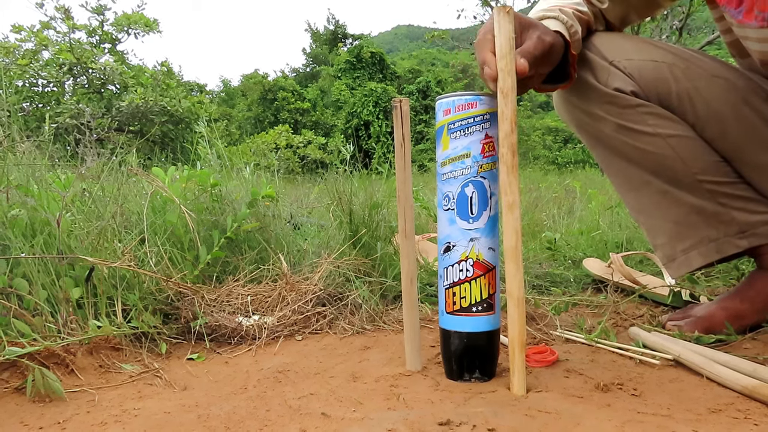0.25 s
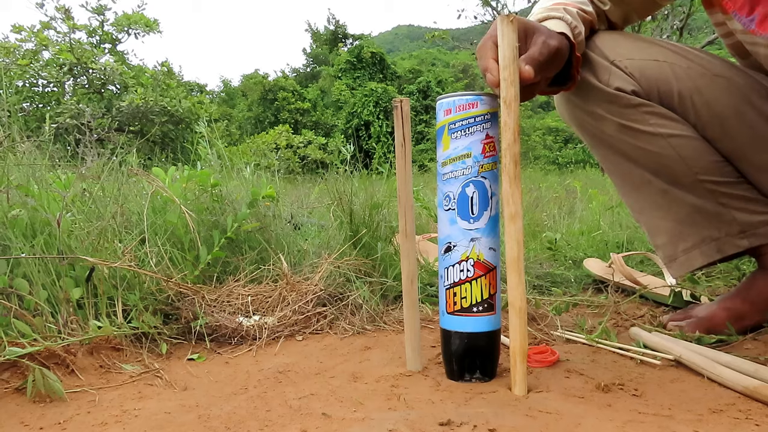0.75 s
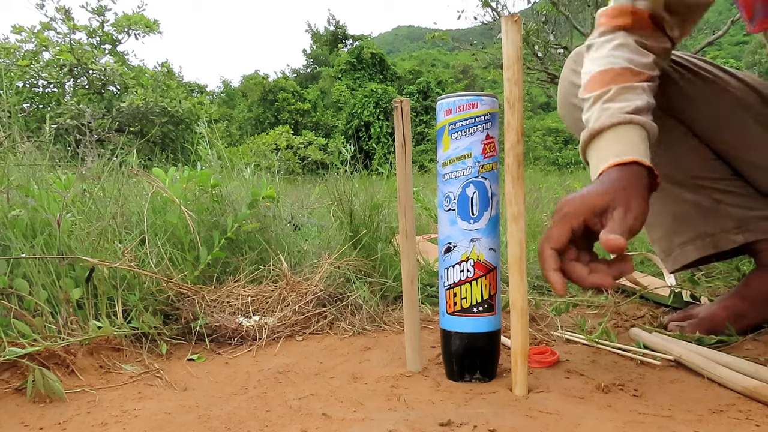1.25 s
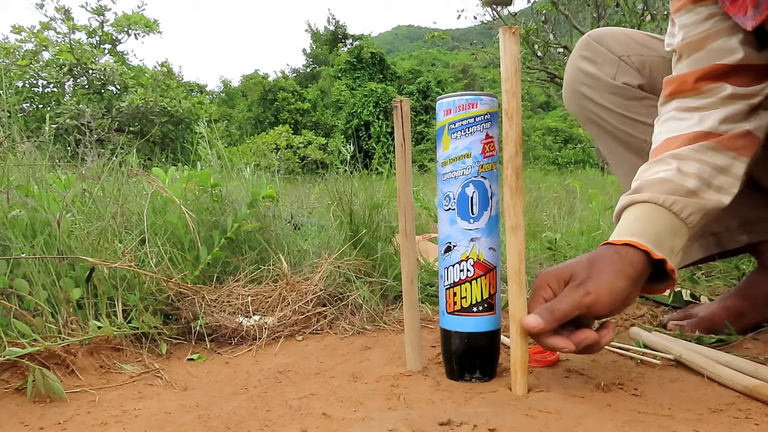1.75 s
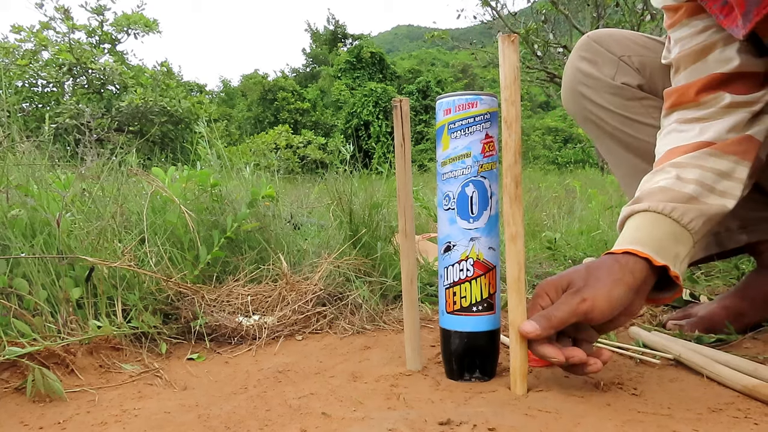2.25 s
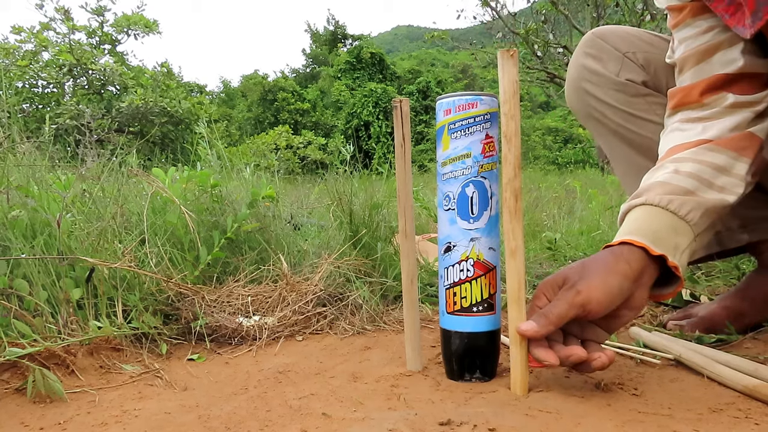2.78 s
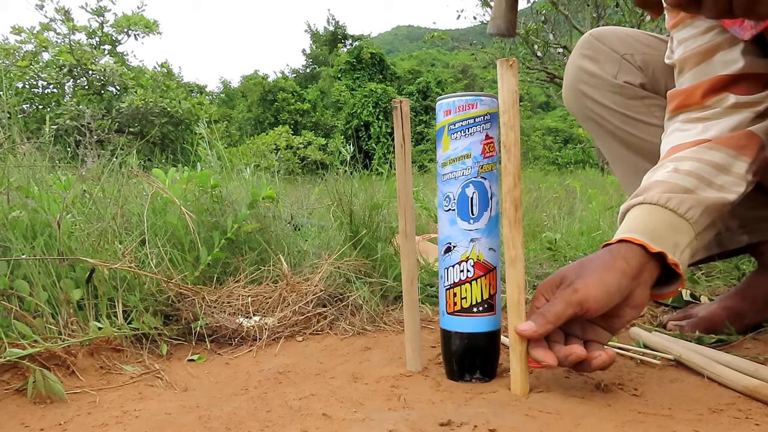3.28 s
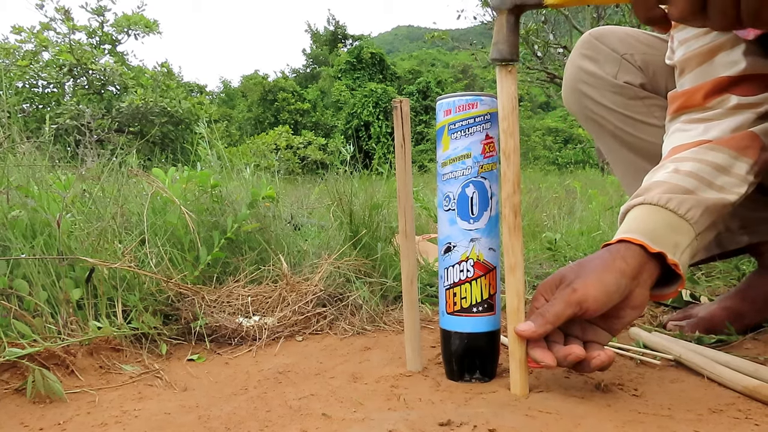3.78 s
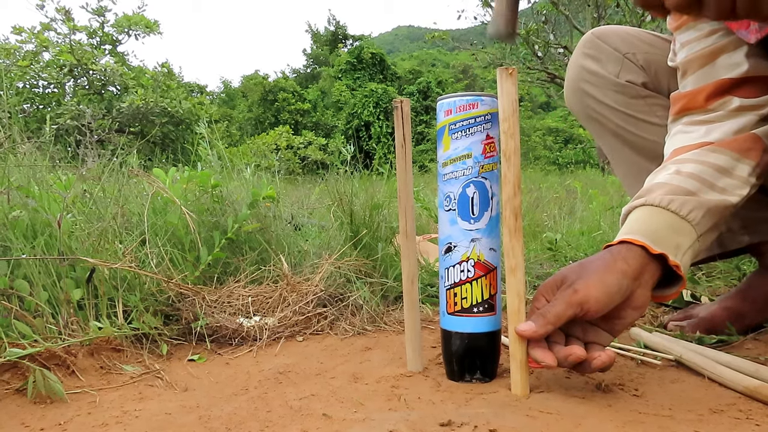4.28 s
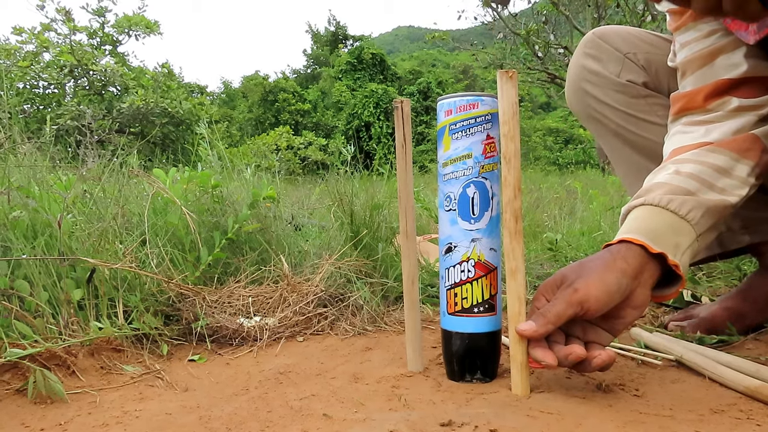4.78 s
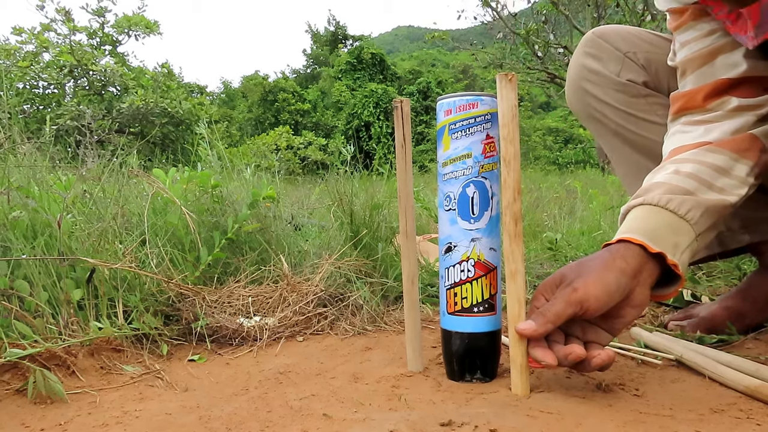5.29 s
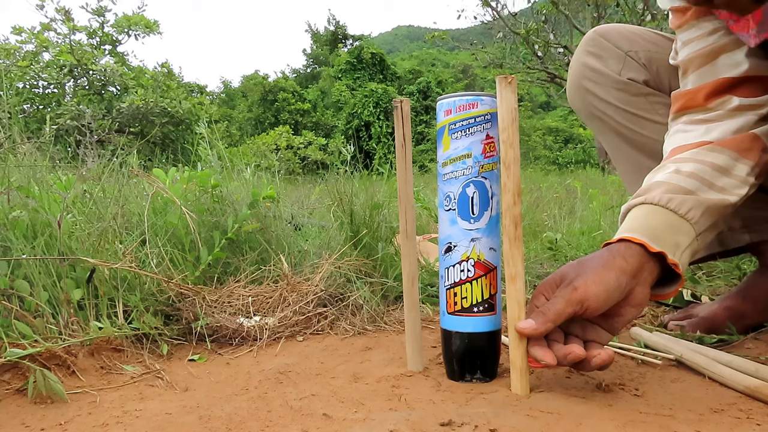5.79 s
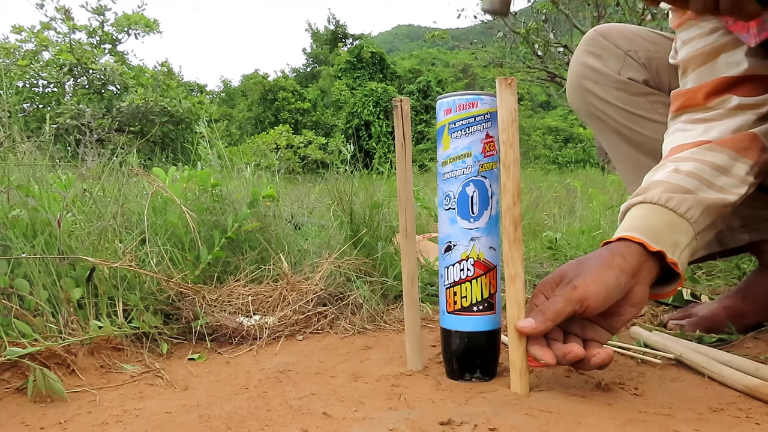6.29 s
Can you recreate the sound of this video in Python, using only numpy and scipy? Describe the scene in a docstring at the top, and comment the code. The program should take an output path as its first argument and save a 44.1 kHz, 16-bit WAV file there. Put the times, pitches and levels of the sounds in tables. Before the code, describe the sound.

Outdoors on sandy ground, short bright knocks of steel on wood come steadily and very near, slightly right of centre. The fourth hit slips into a quick rattling cluster, followed by a pause and a soft cloth rub. Hammering continues with hollow woody clacks and a faint metallic ring, then deepens into solid thuds as the stake seats. Little echo, only a slight scatter from grass and bushes; thin birds and fading breeze far behind.

```python
"""An open field with sandy ground: a steel hammer drives a thin wooden stake close to the microphones.
Each blow sums decaying wood modes, fibre noise, a low soil thump, a faint steel note and an outdoor echo;
as the stake seats, the thump grows deep and firm. One blow glances off and stutters with a noisy skid.
A sleeve rubs (noise shaped by arm speed), small birds whistle far away (gliding sines), and a light
breeze (filtered noise) lies around it all."""
import sys
import numpy as np
from scipy import signal
from scipy.fft import rfft, irfft, next_fast_len
from scipy.io import wavfile
from scipy.ndimage import uniform_filter1d, minimum_filter1d, map_coordinates

SR = 44100
rng = np.random.default_rng(int(sys.argv[2]) if len(sys.argv) > 2 else 0)


def put_to_file(sound):
    """Save the sound as 16-bit audio at rate SR, in the file named by the first command-line argument."""
    columns = np.atleast_2d(sound).T  # one column per channel
    safe = np.clip(columns, -1, 1)
    whole_steps = np.round(safe * 32767)
    wavfile.write(sys.argv[1], SR, whole_steps.astype(np.int16))


N = 288414
T = np.arange(int(.3 * SR)) / SR  # time within one blow, s

# breeze: t/s, rumble level before trim/dB, hiss level before trim/dB
BREEZE = [(0.0, -50, -56), (1.64, -50, -56), (3.01, -56, -63), (3.79, -54.5, -61.5), (6.54, -61, -67.5)]
# spectra of the breeze, before scaling to rms 1: f/Hz, level/dB
RUMBLE_SPECTRUM = [(15, -38), (25, -7.5), (43, 4), (75, 2), (147, -2), (403, -10), (492, -39), (600, -11),
                   (780, -45.5), (1320, -120)]
HISS_SPECTRUM = [(240, -30), (400, -5), (510, -6.5), (630, -5.5), (768, -8.5), (854, -1.5), (1160, -14),
                 (1210, -11.5), (2060, -14), (3340, -18), (4330, -18.5), (13100, -36.5), (15000, -49.5)]
# stereo width of breeze and cloth: f/Hz, side minus mid level/dB
STEREO_WIDTH = [(60, -20.5), (180, -1), (550, -0.5), (1650, -2), (4970, -3), (15000, 0)]
# hammer contacts: t/s, force level/dB, squareness of the hit/dB, extra clack of the shaft/dB
HAMMER_BLOWS = [(0.2098, -1, 1, -6), (0.4997, 0.5, -4, 3), (0.7926, -1, 4, 1), (1.0889, 2, -9.5, 0),
                (1.1028, -7, -12, -2), (1.121, -7.5, -7.5, -6), (1.132, 2, -0.5, -5),
                (1.1382, -10, 4, -3.5), (1.542, 0, -1, -2), (1.876, 1.5, 0.5, 3), (2.1844, -0.5, 2.5, -1.5),
                (2.4932, -1.5, 4.5, -1), (2.8049, 0, 1, 1.5), (3.0957, 0, -3, 0.5), (3.3936, -0.5, -1, -1),
                (3.672, 0.5, -1, 0.5), (3.953, 0.5, -2, 0.5), (4.2218, 1.5, -1, 1), (4.4935, 1, -1, -2),
                (4.7596, 1, -0.6, 0), (5.0332, 0.6, -0.5, 1), (5.3034, 1.5, -1, 0), (5.5753, -1, 2, -1),
                (5.8372, -0.5, -1.2, -1.5), (6.0895, -1, -1.5, -2.5), (6.331, 0.5, -2.5, -3.5)]
# mean levels in a blow: gripped at the top/dB, free and loose/dB, seated/dB, gain per dB of squareness/dB
# rows: thump of the soil, then knock, clack, snap and edge of the wood
BLOW_VOICES = [(-18, -21.5, -8, 0), (-23, -22.5, -22, 0), (-16, -13, -19.5, 0.57),
               (-18.5, -13.5, -17.2, 1.03), (-34.5, -28, -25.5, 1.68)]
# borders of the knock, clack, snap and edge registers of the wood: f/Hz
REGISTER_EDGES = [350, 1000, 2300, 5200, 15000]
# stake modes: mean f/Hz, t60 in loose soil/s, level gripped/dB, level free and loose/dB, level seated/dB
STAKE_MODES = [(469, 0.033, -5.5, -7.5, -8), (574.7, 0.026, -4.5, -11.5, -3.5),
               (756, 0.023, -24, -11.5, -12.5), (834, 0.02, -10.5, -13.5, -11.5),
               (1257, 0.017, -1.5, -5.5, -5.5), (1573, .016, 0.5, 0, -9), (1743, 0.017, -6.5, -1, -5),
               (2143, 0.013, -7, -4.5, -12.5), (2558, 0.017, -4, -11.5, -4), (2888, 0.012, 4, 0, -5),
               (3562, 0.011, -13.5, -10, -4), (3867, .021, -5, -7, -8.5), (3973, 0.017, 2.5, -5, -3),
               (4340, 0.007, -7, -22, 4), (4898, 0.018, -13, -11.5, -11.5), (5618, 0.014, -10, -10, -5),
               (6467, 0.013, -29, -15.5, -11), (6814, 0.014, -25.5, -20, -10.5),
               (7700, .016, -26.5, -22, -15), (8376, 0.013, -15, -21, -11.5),
               (9305, 0.0092, -15, -26.5, -18), (10400, 0.019, -32, -26, -29.5)]
# crunch of the wood fibres: f/Hz, level/dB
FIBRE_SPECTRUM = [(400, -2.5), (1000, -6.5), (1800, -6), (4000, 0.5), (7000, -12), (11000, -24.5),
                  (16000, -37)]
# the stake swaying in loose and in firm soil: f/Hz, t60/s, level/dB
LOOSE_SOIL_MODES = [(141, 0.054, 3.5), (213, 0.054, -4), (299.3, 0.077, -4), (75.36, 0.079, -5.5)]
FIRM_SOIL_MODES = [(120, 0.051, -8), (245.1, 0.024, 5), (300, 0.034, -17), (92, .06, -30.5)]
# answer of the grass and bushes: f/Hz, level/dB
FOLIAGE_SPECTRUM = [(60, 3.5), (200, 5), (500, 0.5), (1500, -5.5), (2600, -6.5), (3350, 8), (4100, -2.5),
                    (5600, -4), (7000, -0.5), (14000, -9)]
# arm movements: t of fastest motion/s, speeding up/s, slowing down/s, level/dB
ARM_REACHES = [(.53, 0.044, 0.11, -53), (1.41, 0.14, 0.087, -43.5), (1.73, 0.066, .11, -63)]
# rubbing cloth, before scaling to rms 1: f/Hz, level/dB
CLOTH_SPECTRUM = [(500, -27.5), (900, -13), (1300, -5), (2100, 3), (2800, -5.5), (4000, -7), (5000, -13.5),
                  (7600, -17.5), (11000, -25.5), (15000, -32)]
# colour of the skid, before scaling to rms 1: f/Hz, level/dB
SKID_SPECTRUM = [(80, -7), (250, 9), (450, -12), (750, 4.5), (1100, -42), (2600, -15), (4200, -25.5),
                 (8000, -35), (15000, -56.5)]
# bird whistles: t/s, length/s, start f/Hz, end f/Hz, level before foliage and direct share/dB
BIRD_WHISTLES = [(2.02, .12, 5270, 6000, -66), (2.289, 0.15, 3900, 5280, -62.5),
                 (2.423, .07, 5600, 6286, -65), (3.81, 0.1, 5150, 5960, -68),
                 (4.642, 0.12, 1850, 1514, -63), (4.778, .16, 3650, 5380, -60),
                 (4.921, .075, 5830, 6230, -64), (5.202, 0.074, 3240, 3350, -70)]

GUST_DB = 2  # depth of the rumble's unevenness
RELEASE_S = 1.7  # the hand lets go of the top of the stake
SEAT_S, SEAT_SPAN_S = 4.22, .21  # the stake bites into firm soil around this time, over about this span
CONTACT_S = 0.00082  # the hammer face sinks into the end grain
HAMMER_HZ, HAMMER_T60_S = 4930, .22  # the head's ring in the hand's grip
# level on a square hit at 0 dB force, change while the stake is gripped, loss per dB off square
RING_DB, RING_GRIPPED_DB, RING_LOSS = -50.5, -15, 3.7
SKID_S, SKID_LENGTH_S, SKID_ATTACK_S, SKID_T60_S, SKID_DB = 1.094, .04, .003, .04, -26.5
TOP_HZ = 16300  # band limit of the microphone channel


def amp(db):
    """Decibels to gain."""
    return 10 ** (np.asarray(db) / 20)


def unit(x):
    """Scaled to rms 1."""
    return x / np.sqrt(np.mean(x ** 2) + 1e-20)


def burst(x):
    """Scaled to the energy of a hundredth of a second at rms 1."""
    return x / np.sqrt(np.sum(x ** 2) / (SR / 100) + 1e-20)


def curves(rows):
    """One value per sample for each column after the time."""
    s, *columns = np.transpose(rows)
    return [np.interp(np.arange(N) / SR, s, column) for column in columns]


def wobble(rate):
    """A smooth random curve, rate knots a second."""
    knots = rng.standard_normal(int(N * rate / SR) + 4)
    return map_coordinates(knots, [np.arange(N) * rate / SR])


def coloured(x, points):
    """x through a spectrum of (Hz, dB) points on a log frequency axis."""
    n = x.shape[-1]
    m = next_fast_len(n + SR // 10)
    hz, db = np.transpose(points)
    log_hz = np.log(np.fft.rfftfreq(m, 1 / SR) + 1)
    gain = amp(np.interp(log_hz, np.log(hz), db))
    return irfft(rfft(x, m) * gain, m)[..., :n]


def rush(spectrum):
    """Stereo noise of rms 1, alike in both channels in the bass and wider in the treble."""
    mid, side = coloured(rng.standard_normal((2, N)), spectrum)
    side = coloured(side, STEREO_WIDTH)
    return unit(np.array([mid + side, mid - side]))


def add(track, s, sound):
    """Mixes a sound into the track at time s."""
    start = max(round(s * SR), 0)
    part = track[..., start:start + sound.shape[-1]]
    part += sound[..., :part.shape[-1]]


def air(rumble_trim_db=1, hiss_trim_db=4.5):
    """A light, fading breeze: turbulent air as uneven low noise under the more even hiss of the field."""
    rumble_db, hiss_db = curves(BREEZE)
    rumble_gain = amp(rumble_db + rumble_trim_db + GUST_DB * wobble(14))
    hiss_gain = amp(hiss_db + hiss_trim_db + .5 * wobble(2.2))
    return rumble_gain * rush(RUMBLE_SPECTRUM) + hiss_gain * rush(HISS_SPECTRUM)


def seating(s):
    """How firmly the soil holds the stake at time s, from 0 (loose) to 1 (seated)."""
    return 1 / (1 + np.exp((SEAT_S - s) / SEAT_SPAN_S))


def voices(gripped, seat, force_db, square_db):
    """Seating shifts the balance of wood and soil energy; a square hit is brighter than a glancing one."""
    gripped_db, free_db, firm_db, brightening = np.transpose(BLOW_VOICES)
    loose_db = gripped_db if gripped else free_db
    energy = (1 - seat) * amp(loose_db) ** 2 + seat * amp(firm_db) ** 2
    return 10 * np.log10(energy) + force_db + brightening * square_db


def head_ring(gripped, force_db, square_db):
    """Level of the steel's ring: weaker on a glancing hit and while the stake is gripped."""
    return RING_DB + force_db + RING_LOSS * min(square_db, 0) + RING_GRIPPED_DB * gripped


def wood(gripped, seat, levels_db, damping=0.092, attack_cycles=0.98, crunch_db=1, crunch_t60=.011,
         scatter_db=2.0, detune=0.021):
    """The stake's short ring and the crunch of its fibres; the hand and the soil each favour other modes."""
    hz, t60, gripped_db, free_db, firm_db = np.transpose(STAKE_MODES)[:, :, None]
    level, pitch, phase = rng.standard_normal((3, len(STAKE_MODES), 1))
    loose_db = gripped_db if gripped else free_db
    life = 1 - np.clip(damping * seat, 0, .8)  # firm soil shortens the ring
    mode_db = loose_db + seat * (firm_db - loose_db) + scatter_db * level
    decay = amp(mode_db - 60 * T / (t60 * life))
    swell = 1 - np.exp(-T * hz / attack_cycles)  # high modes speak first
    tones = np.sin(2 * np.pi * (hz * (1 + detune * pitch) * T + phase))
    ring = np.sum(decay * swell * tones, 0)
    fibres = unit(coloured(rng.standard_normal(len(T)), FIBRE_SPECTRUM))
    crunch = fibres * amp(crunch_db - 60 * T / (crunch_t60 * life))
    crack = (ring + crunch) * (1 - np.exp(-(T / CONTACT_S) ** 2))
    # the angle of the hammer face shares the energy out among the registers
    blow = np.zeros(len(T))
    for low_hz, high_hz, db in zip(REGISTER_EDGES, REGISTER_EDGES[1:], levels_db):
        band = signal.butter(3, (low_hz, high_hz), "band", fs=SR, output="sos")
        blow += amp(db) * burst(signal.sosfilt(band, crack))
    return blow


def soil(seat, lag=.0024, rise=0.0038, slip_share=0.63, slip_delay=.0082):
    """The push reaches the ground late and swells into a low thump; a loose stake slips and lands again."""
    modes = (1 - seat) * np.array(LOOSE_SOIL_MODES) + seat * np.array(FIRM_SOIL_MODES)
    t = np.maximum(T - lag - np.array([[0], [slip_delay]]), 0)  # rows: push, landing
    sway = np.zeros_like(t)
    for k, (hz, t60, db) in enumerate(modes):
        sway += (-1) ** k * amp(db - 60 * t / t60) * np.sin(2 * np.pi * hz * t)
    push, landing = sway * (1 - np.exp(-t / rise))
    return -burst(push + slip_share * (1 - seat) ** 3 * landing)


def hammer(split_hz=21, twin_db=-10):
    """The steel head rings on faintly with one high note, beating against a close twin."""
    note = np.sin(2 * np.pi * HAMMER_HZ * T)
    twin = amp(twin_db) * np.sin(2 * np.pi * ((HAMMER_HZ + split_hz) * T + rng.random()))
    return np.sqrt(2) * amp(-60 * T / HAMMER_T60_S) * (note + twin)


def field(blow, near_db=-44, near_t60=0.15, far_db=-45, far_t60=.15):
    """Grass scatters a little of the blow at once; the bushes answer later."""
    far_delay = .036  # s
    near = amp(near_db) * unit(amp(-60 * T / near_t60))
    far = amp(far_db) * unit((T > far_delay) * amp(-60 * np.abs(T - far_delay) / far_t60))
    scatter = unit(coloured(rng.standard_normal((3, len(T))), FOLIAGE_SPECTRUM))
    stereo = unit(scatter[:2] + 2 * scatter[2])  # the third noise is shared by both channels
    tail = stereo * np.hypot(near, far) / np.sqrt(len(T))
    return signal.fftconvolve(blow[None], tail, axes=1)


def hammering(lean_db=0.66, lag=.000016):
    """Every blow excites wood, soil and steel together, a little right of centre."""
    direct, echo = np.zeros(N), np.zeros((2, N))
    for s, force_db, square_db, shaft_db in HAMMER_BLOWS:
        gripped, seat = s < RELEASE_S, seating(s)
        thump_db, knock_db, clack_db, snap_db, edge_db = voices(gripped, seat, force_db, square_db)
        ring_db = head_ring(gripped, force_db, square_db)
        wood_db = knock_db, clack_db + shaft_db, snap_db, edge_db
        blow = wood(gripped, seat, wood_db) + amp(thump_db) * soil(seat) + amp(ring_db) * hammer()
        add(direct, s, blow)
        add(echo, s, field(blow))
    m = next_fast_len(N + SR // 10)
    hz = np.fft.rfftfreq(m, 1 / SR)
    side = np.array([[-1], [1]])  # left, right
    # the right microphone hears it earlier and, above the bass, slightly louder
    level = amp(side * lean_db * hz / (hz + 500))
    advance = np.exp(1j * np.pi * hz * lag * side)
    return irfft(rfft(direct, m) * level * advance, m)[:, :N] + echo


def sleeve(swell_db=1, catch_db=2):
    """Cloth rubs in small uneven catches, swelling and fading with the speed of the arm."""
    t = np.arange(N) / SR
    motion = np.zeros(N)
    for s, rise, fall, db in ARM_REACHES:
        motion += amp(db) * np.exp(-((t - s) / np.where(t < s, rise, fall)) ** 2)
    unevenness = amp(swell_db * wobble(20) + catch_db * wobble(300))
    return motion * unevenness * rush(CLOTH_SPECTRUM)


def skid(catch_db=3):
    """Steel catches and slips on the wood many times in a few hundredths of a second."""
    t = np.maximum(np.arange(N) / SR - SKID_S, 0)
    attack = 1 - np.exp(-t / SKID_ATTACK_S)
    contact = attack * amp(-60 * np.maximum(t - SKID_LENGTH_S, 0) / SKID_T60_S)
    catches = rng.standard_normal(N) * amp(catch_db * wobble(440))
    return amp(SKID_DB) * contact * unit(coloured(catches, SKID_SPECTRUM))


def bird(smear_t60=.14, direct=.5):
    """Thin gliding whistles, mostly rising, raspy and blurred by the foliage they pass through."""
    unsteady = 1 + .012 * wobble(60) + .022 * wobble(900)  # slow waver and fast rasp of the pitch
    song = np.zeros(N)
    for s, length, start_hz, end_hz, db in BIRD_WHISTLES:
        u = np.linspace(0, 1, int(length * SR))
        hz = (start_hz + (end_hz - start_hz) * u) * unsteady[int(s * SR):][:len(u)]
        swell = np.sqrt(np.abs(np.sin(np.pi * u ** 1.5)))
        add(song, s, amp(db) * swell * np.sin(2 * np.pi * np.cumsum(hz) / SR))
    leaves = unit(rng.standard_normal((2, len(T))) * amp(-60 * T / smear_t60)) / np.sqrt(len(T))
    return direct * song + signal.fftconvolve(song[None], leaves, axes=1)[:, :N]


def scene():
    """The hammering close by, in front of the quiet field."""
    return air() + hammering() + sleeve() + skid() + bird()


def record(dry, ceiling=0.93):
    """A fast limiter holds down the highest peaks; the microphone channel ends at its band limit."""
    size = SR // 2500  # 0.4 ms
    needed = np.minimum(1, ceiling / (np.abs(dry).max(0) + 1e-9))
    limited = dry * uniform_filter1d(minimum_filter1d(needed, size), size)
    m = next_fast_len(N + SR // 10)
    passed = np.fft.rfftfreq(m, 1 / SR) < TOP_HZ
    return irfft(rfft(limited, m) * passed, m)[:, :N]


dry = scene()
out = record(dry)
put_to_file(out)
```